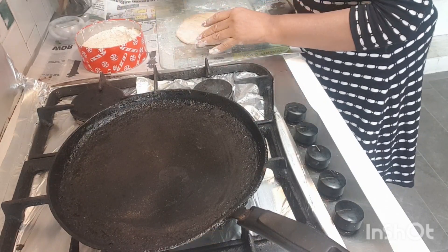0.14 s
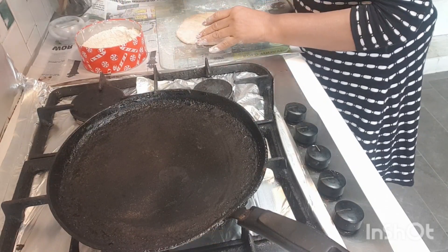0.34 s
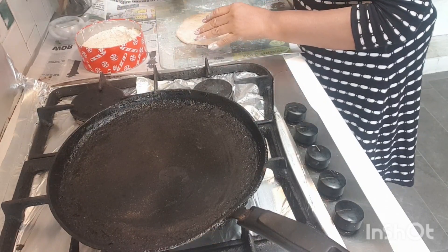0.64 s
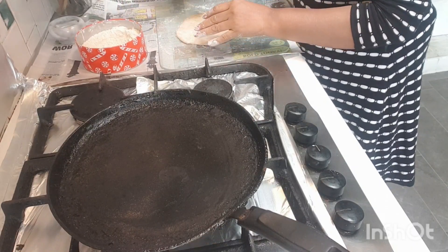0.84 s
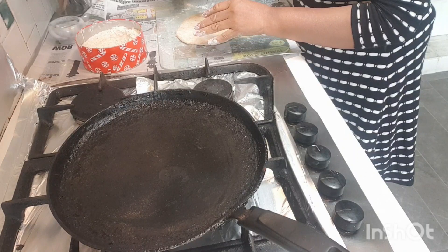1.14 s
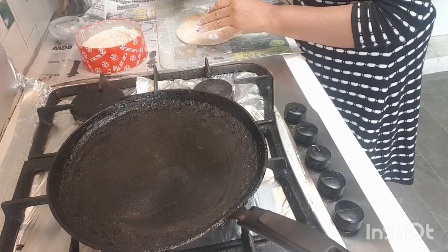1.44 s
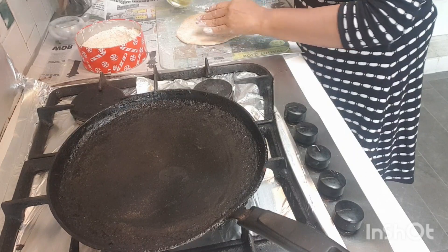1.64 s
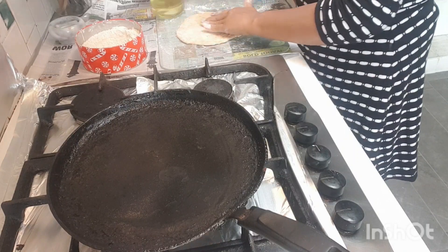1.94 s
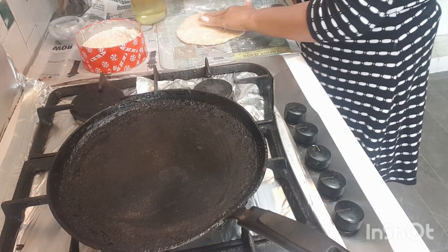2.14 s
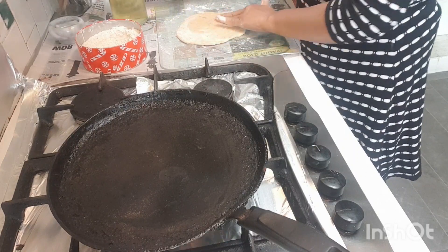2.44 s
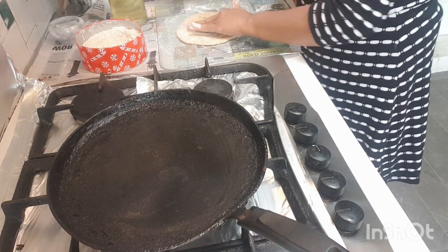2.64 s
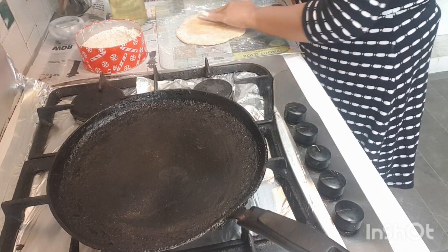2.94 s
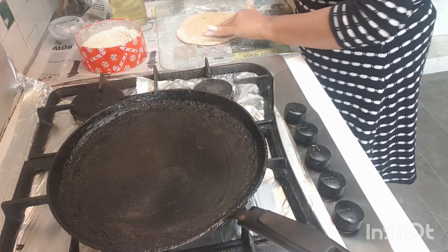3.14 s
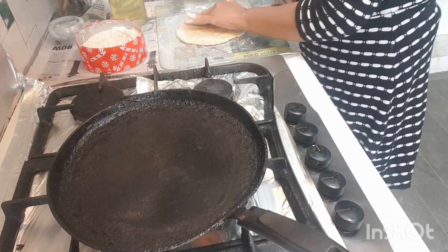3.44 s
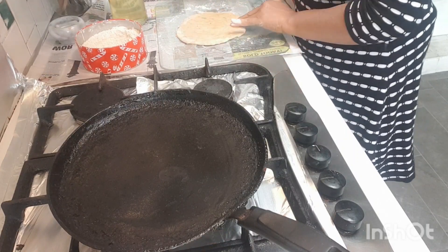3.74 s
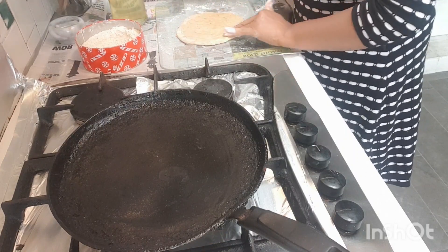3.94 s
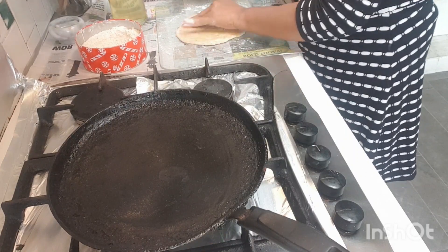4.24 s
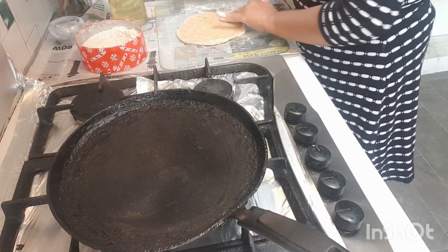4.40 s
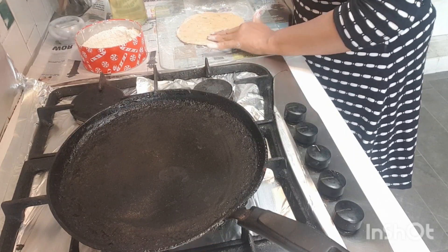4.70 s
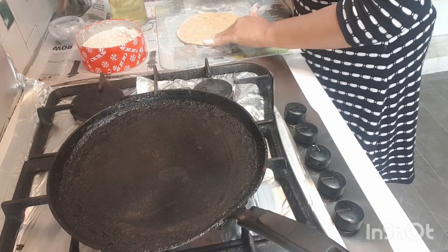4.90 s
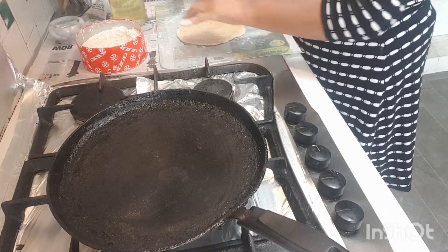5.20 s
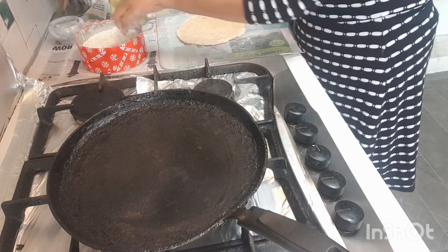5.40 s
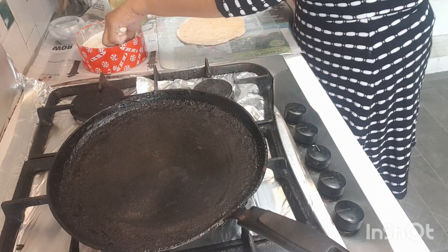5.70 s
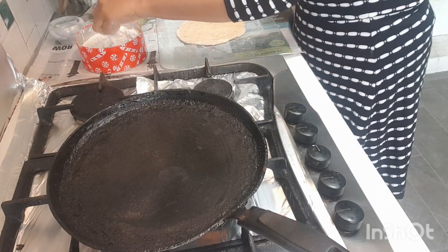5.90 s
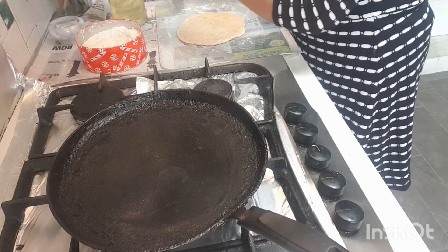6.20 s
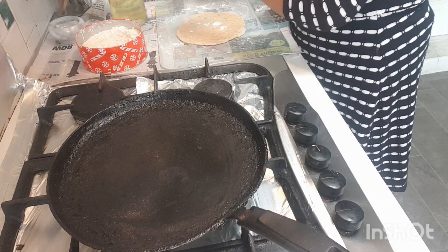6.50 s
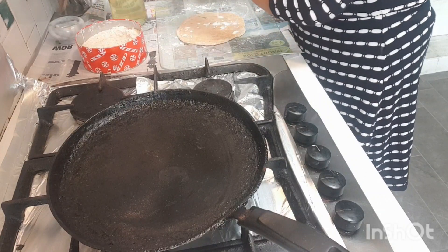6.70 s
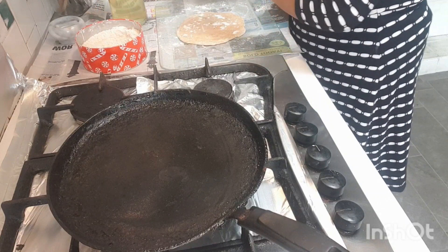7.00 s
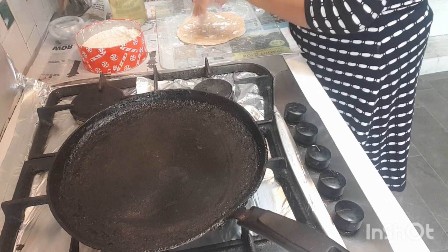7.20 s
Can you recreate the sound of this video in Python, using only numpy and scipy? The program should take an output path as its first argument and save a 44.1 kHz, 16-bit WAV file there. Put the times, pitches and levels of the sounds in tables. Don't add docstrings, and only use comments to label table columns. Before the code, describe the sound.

In a hard-walled kitchen, close to a stereo microphone, hands pat dough on paper, making sharp irregular snaps and small crinkles. About two seconds in, a heavy bottle lands with a loud, deep thump, bounces and scrapes in a stuttering glassy drag. The crackling continues to the end over a steady fan, mains hum and muffled street engines, one revving and rising in pitch.

```python
import sys
import numpy as np
from scipy import signal
from scipy.fft import rfft, irfft, next_fast_len
from scipy.io import wavfile
from scipy.ndimage import uniform_filter1d, map_coordinates

SR = 44100
rng = np.random.default_rng(int(sys.argv[2]) if len(sys.argv) > 2 else 0)


def unload_wav(signal):
    wavfile.write(
        sys.argv[1],
        SR,
        np.round(np.clip(np.atleast_2d(signal).T, -1, 1) * 32767).astype(np.int16),
    )


def volts_from_decibels(level):
    exponent = np.asarray(level, float) / 20
    return 10 ** exponent


N = 324135
T = np.arange(N) / SR


def in_time(rows):
    s, *columns = np.transpose(rows)
    return [np.interp(T, s, column) for column in columns]


def sounding(rows, fade_s=0.11):
    opening = T - rows[0][0] + fade_s
    closing = rows[-1][0] + fade_s - T
    return np.clip(np.minimum(opening, closing) / fade_s, 0, 1)


def at_hz(points, hz):
    table_hz, value = np.array(points).T
    return np.interp(np.log(hz), np.log(table_hz), value)


def rms_one(x):
    return x / np.sqrt(np.mean(x ** 2) + 1e-20)


def band(x, low_hz, high_hz):
    edges = [low_hz, min(high_hz, .45 * SR)]
    return signal.sosfilt(signal.butter(2, edges, "band", fs=SR, output="sos"), x + 1e-18)


def drift(rate_hz):
    knots = rng.standard_normal(600)
    coarse = T[::16]
    return np.interp(T, coarse, map_coordinates(knots, [coarse * min(rate_hz, 70)], order=3))


def resonate(x, hz, width_hz):
    r = np.exp(-np.pi * width_hz / SR)
    zeros = np.array([1, 0, -1]) * (1 - r * r) / 2
    return signal.lfilter(zeros, [1, -2 * r * np.cos(2 * np.pi * hz / SR), r * r], x + 1e-18)


def wander(x, hz, width_hz):
    turn = np.exp(2j * np.pi * np.cumsum(hz) / SR)
    r = np.exp(-np.pi * width_hz / SR)
    return np.real(turn * signal.lfilter([1 - r], [1, -r], x / turn + 1e-18))


def ring(clicks, modes, damping=1):
    out = 0
    for hz, level_db, t60_s in modes:
        r = volts_from_decibels(-60 / (np.clip(t60_s * damping, .005, .4) * SR))
        w = 2 * np.pi * hz / SR
        out += volts_from_decibels(level_db) * signal.lfilter([0, np.sin(w)], [1, -2 * r * np.cos(w), r * r], clicks + 1e-18)
    return out


def grains(per_s, spread_db):
    sizes = volts_from_decibels(spread_db * np.minimum(rng.exponential(1, (2, N)), 4))
    signs = rng.choice([-1, 1], (2, N))
    return sizes * signs * (rng.random((2, N)) < per_s / SR)


def dying(events, over_db, t60_s):
    lifts = np.zeros(N)
    for s, level_db in events:
        lifts[round(s * SR)] = volts_from_decibels(level_db + over_db)
    lifts = np.convolve(lifts, np.ones(40) / 40)[:N]
    return 1 + signal.lfilter([1], [1, -volts_from_decibels(-60 / (t60_s * SR))], lifts + 1e-18)


# (frequency [Hz], correlation [-1 to 1])
PORT_LIKENESS = [(60, 0.99), (130, 0.92), (290, 0.76), (640, 0.95), (1410, -0.19), (3100, -0.29),
                 (6820, -0.32), (15000, 0.34)]


def two_ports(mid, side, hz):
    alike = np.clip(at_hz(PORT_LIKENESS, hz), -1, 1)
    return np.sqrt(1 + alike) * mid + np.sqrt(1 - alike) * side * [[1], [-1]]


# (frequency [Hz], level difference [dB])
PORT_LEAN = [(60, 5), (300, 4), (600, 18), (1300, 4), (2400, 6.5), (4400, -5.5), (7000, 5), (15000, 19.5)]


def coloured(pair, spectrum):
    size = next_fast_len(N + 4096)
    hz = np.clip(np.arange(size // 2 + 1) * SR / size, 1, spectrum[-2][0])
    mid, side = rfft(pair, size) * volts_from_decibels(at_hz(spectrum, hz))
    lean = volts_from_decibels(at_hz(PORT_LEAN, hz) / 2 * [[1], [-1]])
    return rms_one(irfft(two_ports(mid, side, hz) * lean, size)[:, :N])


def kitchen(x):
    t60_s, level_db = 0.38, -6
    t = np.arange(SR // 2) / SR
    tail = rng.standard_normal((2, len(t))) * volts_from_decibels(-60 * t / t60_s) * (t > .003)
    tail = band(tail, 180, 4700) + 1.28 * tail
    tail /= np.sqrt(np.sum(tail ** 2, axis=1, keepdims=True))
    return x + volts_from_decibels(level_db) * signal.fftconvolve(x, tail, axes=1)[:, :N]


def low_tone(hz, gain):
    phase = 2 * np.pi * np.cumsum(hz) / SR + .2 * drift(8)
    tone = np.sin(phase) + volts_from_decibels(-32) * np.sin(3 * phase) + volts_from_decibels(-30) * np.sin(2 * phase)
    return np.sqrt(2) * gain * tone


# (time [s], pitch [Hz], level [dB])
MAINS_HUM = [(0.0, 49.1, -64), (2.35, 49.1, -54.5), (4.9, 48.7, -60.5), (5.8, 49.04, -53),
             (7.35, 50.3, -55)]


def mains():
    hz, level_db = in_time(MAINS_HUM)
    return low_tone(hz, volts_from_decibels(level_db))


# (time [s], firing tone [Hz], level [dB])
FAR_ENGINES = [
    [(.2, 108.5, -55.5), (.5, 111.7, -43.5), (.7, 119.1, -49.5)],
    [(.95, 120.4, -52.5), (1.85, 120.6, -52)],
    [(0, 53, -49), (.45, 56.6, -53)],
    [(.8, 57, -50), (1.85, 59.3, -53)],
    [(3.3, 110.7, -54.5), (4.5, 122.5, -58.5)],
    [(4.85, 66.6, -56), (5.8, 82, -60.5)],
    [(6.05, 85.8, -53), (6.22, 86.3, -49.5)],
    [(6.4, 73.2, -53.5), (6.6, 71.8, -49)],
    [(7.2, 82.7, -54), (7.35, 93.6, -42.5)],
    [(6.5, 101.3, -60), (6.6, 102.3, -49.5)],
    [(6.9, 101.4, -57), (7.0, 108.3, -56)],
]


def far_engines():
    out = np.zeros(N)
    for rows in FAR_ENGINES:
        hz, level_db = in_time(rows)
        out += low_tone(hz, volts_from_decibels(level_db) * sounding(rows, fade_s=.16))
    return out


# (time
# [s], pitch [Hz], level [dB])
ENGINE_WHINES = [
    [(0, 108, -60), (.2, 108, -76)],
    [(2.35, 122, -67), (2.75, 135, -60), (3.05, 123, -63)],
    [(4.1, 240, -71), (4.5, 260, -71.5)],
    [(5.4, 246, -69), (6.3, 264, -73)],
    [(5.8, 82, -60), (6.05, 86, -56)],
]


def whines():
    out = np.zeros(N)
    for rows in ENGINE_WHINES:
        hz, level_db = in_time(rows)
        gain = volts_from_decibels(level_db + 1.4 * drift(9)) * sounding(rows, fade_s=.16)
        out += np.sqrt(2) * gain * np.sin(2 * np.pi * np.cumsum(hz) / SR)
    return out


# (time [s], firing tone [Hz], level [dB])
LORRY_REVS = [
    (2.2, 61.27, -36.5),
    (2.75, 67.44, -33.5),
    (3.1, 61.1, -35.5),
    (3.25, 66.74, -34),
    (3.75, 82.4, -46),
    (4.23, 91.54, -38),
    (4.68, 104.8, -40.5),
    (5.3, 118.2, -45),
    (5.9, 130, -79),
]
# (pitch [Hz], width [Hz], depth [dB])
WALL_DIPS = [(60.16, 6.8, -10), (75.1, 3.1, -20), (82, 2.1, -7), (92.5, 4.4, -17.5), (98.8, 6, -11.5),
             (110.8, 4.8, -10), (116.15, 3.1, -18)]


def lorry():
    hz, level_db = in_time(LORRY_REVS)
    dips_db = sum(db * np.exp(-(2 * (hz - dead_hz) / width_hz) ** 2) for dead_hz, width_hz, db in WALL_DIPS)
    return low_tone(hz, volts_from_decibels(level_db) * sounding(LORRY_REVS) * volts_from_decibels(dips_db))


# (frequency [Hz], density [dB per Hz])
FAN_AIR = [(15, -54), (32, -7), (60, 4.5), (99, 1), (340, -18.5), (537, -19.5), (826, -21), (945, -84),
           (1140, -32.5), (2060, -34), (2850, -31.5), (3090, -74), (7300, -27), (13200, -39), (15500, -45)]
# (frequency [Hz], width [Hz], level [dB])
FAN_HOUSING = [(205.5, 17, -86), (292.4, 35, -73), (100.7, 19, -59.5), (434, 5.2, -75), (629, 84, -65.5),
               (743, 20, -69), (814.7, 66.5, -65.5), (2445, 120, -77.5), (2817, 140, -78)]


def fan():
    flutter = volts_from_decibels(.7 * drift(6))
    air = volts_from_decibels(-53) * flutter * coloured(rng.standard_normal((2, N)), FAN_AIR)
    for hz, width_hz, level_db in FAN_HOUSING:
        mid, side = resonate(resonate(rng.standard_normal((2, N)), hz, width_hz), hz, width_hz)
        air += volts_from_decibels(level_db + 3.5 * drift(4.2)) * rms_one(two_ports(mid, side, hz))
    return air


# (time [s], pitch [Hz], width [Hz], level [dB], t60 [s])
NUDGES = [
    (2.559, 4940, 70, -49, .2),
    (2.555, 2270, 40, -58, .45),
    (1.046, 1640, 170, -67, .22),
    (1.045, 2350, 300, -69, .22),
    (1.044, 1250, 400, -64, .05),
    (6.756, 1270, 110, -69, .3),
    (3.478, 3550, 350, -62, .06),
    (3.61, 1200, 150, -74, .1),
]


def clinks():
    out = np.zeros((2, N))
    length = SR // 4
    for s, hz, width_hz, level_db, t60_s in NUDGES:
        at = round(s * SR)
        fading = volts_from_decibels(level_db - 60 * T[:length] / t60_s)
        rub = rng.standard_normal(length) + .5 * rng.standard_normal((2, length))
        out[:, at:at + length] += fading * rms_one(resonate(resonate(rub, hz, width_hz), hz, width_hz))
    return out


# (time [s], peak [dB], knock against peak [dB], direction [1 down, -1 springing back])
COUNTER_BLOWS = [
    (1.955, -8.5, -19.5, 1),
    (1.9735, -47, -10, 1),
    (2.0082, -22, -28, 1),
    (2.031, -26, -19, 1),
    (2.093, -20.5, -15, 1),
    (2.2535, -19.5, -25, -1),
    (2.2905, -17.5, -28, -1),
    (2.337, -20, -27.5, -1),
    (2.384, -28, -22, -1),
    (4.6908, -24, -48, 1),
]
# (frequency [Hz], level [dB], t60 [s])
SLAB_MODES = [(108.5, 5.5, 0.31), (130, -2, 0.067), (157.2, 5, 0.11), (175, -26.5, 0.027),
              (206, -17.5, 0.087), (289.6, -16, 0.27), (435, -6, 0.019)]


def slab(push):
    contact_s, give_s, give_share = 0.0035, 0.0023, 0.25
    blows = np.zeros(N)
    for s, peak_db, _, way in COUNTER_BLOWS:
        blows[round(s * SR)] = np.sign(way) * volts_from_decibels(peak_db - 15)
        blows[round((s - give_s) * SR)] = -give_share * np.sign(way) * volts_from_decibels(peak_db - 7)
    contact = np.hanning(round(contact_s * SR))
    blows = np.convolve(blows, contact / contact.sum())[:N]
    return band(band(ring(blows + push, SLAB_MODES), 73, 590), 33, 1000)


# (frequency [Hz], level [dB], t60 [s])
BASE_MODES = [(421, -1, 0.17), (641, -24, 0.1), (737, -20, 0.3), (824, -26, 0.6), (920, -17, 0.46),
              (1020, -20, 0.1), (1220, -40, 0.3), (1370, -13.5, 0.34), (1630, -19, 0.28)]


def bottle_knocks():
    knock = np.zeros(N)
    for s, peak_db, hard_db, _ in COUNTER_BLOWS:
        knock[round(s * SR)] = volts_from_decibels(peak_db + hard_db + 5.5)
    solid = SR // 450
    t = np.arange(SR // 4) / SR
    rattle = rng.standard_normal(len(t)) * volts_from_decibels(-2.5 - 60 * t / 0.37)
    rattle[solid] += volts_from_decibels(27.5)
    knocks = signal.fftconvolve(knock, rattle)[:N]
    base = volts_from_decibels(-8.5) * ring(np.roll(knock, solid), BASE_MODES, damping=0.68)
    hard = band(band(band(knocks, 300, 1150), 250, 1250) + base, 200, 1700)
    ping = resonate(resonate(knocks, 2870, 350), 2870, 350)
    return hard + volts_from_decibels(-11) * ping + volts_from_decibels(-28) * band(knocks, 1700, 3400)


# (time [s], scrape [dB], weight on the base [dB])
DRAG_COURSE = [
    (2.025, -46.5, 0),
    (2.085, -60.5, 27),
    (2.096, -37, 16),
    (2.12, -33.5, 10),
    (2.126, -30, 1.5),
    (2.245, -29.5, 9.5),
    (2.28, -35.5, 9),
    (2.4, -52.5, 8),
    (2.6, -58, 8),
]
# (frequency [Hz], density [dB per Hz])
SCRAPE_GRIT = [(180, -44), (300, 6.5), (599, 2), (660, -7), (775, -4.5), (840, 1.5), (1620, -7.5),
               (3040, -1.5), (5880, -1.5), (8600, -1.5), (15000, -11), (16000, -30)]
# (frequency [Hz], width [Hz], level [dB])
BOTTLE_MODES = [(407, 31, -1), (753, 31, 12.5), (970, 60, 8), (1590, 9.1, 13), (1777, 20, 11),
                (4120, 110, 12), (4700, 25, 1), (5900, 220, 2)]
# (time [s], level [dB])
BASE_JERKS = [(2.0945, -28), (2.101, -21), (2.1225, -23.5), (2.126, -28), (2.130, -23.5), (2.1445, -29),
              (2.1475, -29), (2.153, -21), (2.158, -28), (2.164, -23), (2.175, -31), (2.1788, -26),
              (2.1845, -29), (2.196, -38), (2.2012, -24), (2.207, -29), (2.2125, -24), (2.2262, -33),
              (2.231, -29), (2.236, -24), (2.249, -32), (2.252, -38), (2.258, -40), (2.2643, -33)]
# (time [s], level [dB])
BASE_CATCHES = [(2.0882, -25.5), (2.0947, -28), (2.1001, -43), (2.1137, -29), (2.1278, -28), (2.1406, -41),
                (2.1455, -28), (2.1515, -38), (2.1571, -22), (2.1625, -27), (2.1684, -36), (2.177, -24),
                (2.1839, -21.5), (2.1954, -29), (2.2006, -17.5), (2.2113, -28), (2.2217, -32.6),
                (2.2301, -23), (2.2382, -28.5), (2.2431, -40), (2.25, -32), (2.2651, -40), (2.2776, -35)]
# (time [s], pitch [Hz])
TILTING_NOTE = [(2.09, 3000), (2.102, 3100), (2.128, 3170), (2.155, 3320), (2.185, 3030), (2.2, 3100),
                (2.226, 2930), (2.25, 3100), (2.3, 3320)]


def drag():
    scrape_db, weight_db = in_time(DRAG_COURSE)
    steady = grains(per_s=8000, spread_db=2.2) * volts_from_decibels(.4 * drift(70))
    hiss_slips = steady * dying(BASE_JERKS, over_db=24, t60_s=.07)
    jerk_slips = steady * dying(BASE_JERKS, over_db=30, t60_s=.033)
    catch_slips = steady * dying(BASE_CATCHES, over_db=40, t60_s=.022)

    def through_bottle(slips, low_hz, high_hz):
        rings = sum(volts_from_decibels(level_db) * rms_one(resonate(slips, hz, width_hz))
                    for hz, width_hz, level_db in BOTTLE_MODES if low_hz < hz < high_hz)
        return rms_one(band(coloured(slips, SCRAPE_GRIT) + volts_from_decibels(-11.5) * rms_one(rings), low_hz, high_hz))

    hiss = through_bottle(hiss_slips, 6500, 17000)
    upper = through_bottle(jerk_slips, 1300, 6500)
    lower = through_bottle(catch_slips, 300, 1500)
    glass = wander(jerk_slips, in_time(TILTING_NOTE)[0], width_hz=430)
    upper = upper + volts_from_decibels(-12) * hiss + volts_from_decibels(-0.5) * rms_one(glass)
    lower = .3 * lower.sum(axis=0) + .6 * lower
    gate = sounding(DRAG_COURSE, fade_s=0.007)
    push = np.tanh(rms_one(catch_slips[0])) * volts_from_decibels(scrape_db + weight_db - 37) * gate
    return gate * volts_from_decibels(scrape_db - 7.5) * (upper - volts_from_decibels(weight_db - 12.5) * lower), push


# (time [s], level [dB])
RUSTLE_LEVEL = [(0.0, -64.5), (0.29, -69.5), (0.78, -74), (0.94, -71), (2.05, -69), (2.31, -53.5),
                (2.41, -54.5), (2.58, -69.5), (3.83, -66), (4.13, -66), (4.89, -69.5), (5.34, -70),
                (5.85, -74.5), (6.08, -73.5), (6.2, -64), (6.34, -70), (7.35, -70.5)]
# (frequency [Hz], density [dB per Hz])
PAPER_COLOUR = [(590, -38), (1000, -1.5), (1600, -7), (1790, -12), (2840, 9), (3080, -2.5), (5720, 6),
                (8740, -2.5), (11000, -1), (15500, -7)]


def paper_rustle():
    rustle = coloured(grains(per_s=1200, spread_db=2.0), PAPER_COLOUR)
    return rustle * volts_from_decibels(in_time(RUSTLE_LEVEL)[0] + 9) * volts_from_decibels(3 * drift(45))


# (time [s], peak [dB], brightness [dB], crinkle after it [dB], deep body [dB])
PAPER_SNAPS = [(0.0545, -40, -8, -6, -15), (0.0682, -35, -8, -6, -28), (0.0833, -64, -2, -6, -10),
               (0.1099, -34, -2, -7.5, -19), (0.161, -46.5, 6, -5.5, -5), (0.1779, -45, -5, -13, -3),
               (0.2504, -36, 0, -9, -9), (0.2664, -36.5, -2, -7, -16), (0.3081, -33, -1, -10.5, -18),
               (0.3465, -37.5, 3, -12.5, -17), (0.396, -41.5, 8, -14, -20), (0.439, -52.5, 1, 0.5, -9),
               (0.4993, -50.5, 0, -2.5, -19), (0.566, -51, 9, 0, -5.5), (0.592, -43, 13, -17.5, 10),
               (0.607, -61, -1, -10, -8), (0.6954, -53.5, 16.5, -9, 5), (0.8068, -47.5, -3, -10, -24),
               (0.954, -42, -17, -8.5, -28), (1.066, -45, -21, -1.5, -9), (1.1602, -51, -2, -3.5, -16),
               (1.255, -54, 5, -4, -19), (1.272, -48, 7, -10, -20), (1.284, -37, -11, -7, -19),
               (1.3127, -38, 0, -4.5, -18), (1.3841, -31.5, 1.5, -9, -22), (1.5548, -54, 3, -6, -21),
               (1.651, -57, 9, -7, -8), (1.665, -49, -1, -10, 2.5), (1.701, -49, -8, -3, -5),
               (1.7087, -52, -9, -3, -4), (1.731, -45.5, -5, -1, -11), (1.762, -37, -4.5, -6, -29),
               (1.7803, -41, -14, -3, -27), (2.0024, -41.5, -4, -6, -5), (2.0247, -53, -3, -9, -9),
               (2.0318, -48, 6, -3, -15), (2.0692, -36, 0.5, -4, -5), (2.4314, -50, -2, -8, -15),
               (2.46, -51, 8, -1, -16), (2.4728, -34, 11, -22, -3), (2.4778, -21.5, -12.5, -2.5, -11),
               (2.5586, -44.5, -19, 4.5, -9), (2.725, -38.5, -29, -1, -20), (2.817, -47, 5, -2.5, -1),
               (2.8616, -48, 3, -3, -17), (2.9144, -35.5, -4, -9, 0.5), (2.974, -43.5, -22, -0.5, -5.5),
               (3.215, -57, -3, 3, -3.5), (3.323, -57, -18, -5, 6), (3.453, -43, -18, -2.5, -31),
               (3.481, -50, -14, -7, -4), (3.508, -55, -19, -9, -20), (3.5228, -39.5, -5, -2.5, -20),
               (3.634, -54, -5, -3, -12), (3.659, -47.5, -26, -0.5, -12), (3.7002, -46.5, -22, 2, -17),
               (3.7655, -49, -20, -3, -10), (3.8286, -57, -5, -8, 0), (3.85, -41.5, 7, -7, -3),
               (3.8788, -48, 9, -6, -22.5), (3.9, -50, 5, -2, -6), (3.9402, -33, -6, -5, -6.5),
               (4.0682, -41, 7, -8.5, -14), (4.0919, -28, -3.5, -13.5, -7), (4.2423, -42.5, -8, -6, -21),
               (4.3113, -24, -4.5, -3, -20), (4.4464, -30.5, -7, -6.5, -21), (4.4577, -38.5, 6, -10, -5.5),
               (4.5128, -31.5, -16, -3, -17), (4.6105, -60.5, 8, 2, -16), (4.6343, -49, -20, -1, -21),
               (4.6665, -47, -18, -2, -20), (4.6907, -42, -5, -5.5, -10), (4.819, -42, -4, -4, -16),
               (4.824, -41.5, 2.5, -2.5, -29), (4.8542, -44, 4, -4.5, -20), (4.8875, -45, 1, -12, -21),
               (4.9302, -51.5, -6, -1.5, -24),
               (5.0441, -35.5, -10, -2.5, -31), (5.138, -54, -15, -1, -10), (5.167, -38.5, -5, -6, -16),
               (5.2686, -37.5, -6, -1.5, -37), (5.37, -49.5, 2, -3, -18), (5.424, -40, 5, -16, -20),
               (5.4779, -46, 0, -8, -33), (5.523, -51, -1, -5, -29), (5.5636, -58, 6, -7, -21),
               (5.5836, -50, 4, -8, -20), (5.638, -42.5, -1, -8, -25), (5.6871, -53, -4, -3, -16),
               (5.761, -51, 0, -3, -26), (5.8234, -38.5, -3, -2.5, -18), (5.9496, -64, 16, -10, -11),
               (6.0287, -49.5, -9, -1, -17), (6.069, -53, -5, -5, -13), (6.0911, -50, -8, -3, -17),
               (6.1337, -50, -12, -12, -5), (6.1571, -32.5, -8, -6, -8.5), (6.1773, -37.5, -9, -9, -15),
               (6.196, -37, -17, -3, -12), (6.2083, -33.5, 1, -10, -20), (6.228, -44, 10, -7, -19),
               (6.278, -36, -7, -4, -11), (6.291, -46.5, -2, 8, -11), (6.3064, -50, -6, -9, -11),
               (6.3286, -34, -10, -1.5, -18), (6.3776, -48.5, -5, -1.5, -11.5), (6.4762, -62, -3, -8, -19),
               (6.4882, -35, -9, -2, -15.5), (6.6045, -42.5, -11, -5, -26), (6.6404, -46, 0, -6, -20),
               (6.658, -47, 5, -5, -14), (6.7286, -36, -0.5, -8, -18), (6.8618, -37.5, -17, -4, -12.5),
               (6.991, -48, -19, -2, -32), (7.0675, -42.5, -35, -0.5, -7.5), (7.1768, -35, -31, -10, -26),
               (7.2356, -31, -13, -9.5, -13.5)]


def paper_snaps():
    crack_t60_s, crinkle_t60_s = .004, .056
    far_lag, far_db = 8, -3
    t = np.arange(SR // 8) / SR
    low, body, top, breaks = np.zeros((4, 2, N + 2 * len(t)))
    blunt, keen = np.hanning(7) / 2, np.eye(7)[3]
    for s, peak_db, bright_db, crinkle_db, low_db in PAPER_SNAPS:
        noise = np.tanh(2 * rng.standard_normal((2, len(t))))
        uneven = volts_from_decibels(3.5 * rng.standard_normal(len(t) // 64 + 1)).repeat(64)[:len(t)]
        crack = noise * volts_from_decibels(-5 - 60 * t / crack_t60_s)
        crack[:, 0] = volts_from_decibels(-10) * np.array([1, -1])
        crinkle = noise * volts_from_decibels(crinkle_db - 3.5 - 60 * t / crinkle_t60_s) * uneven
        start = round(s * SR) + 52
        at = slice(start, start + len(t))
        gain = volts_from_decibels(peak_db + 8.5)
        bright = volts_from_decibels(bright_db + 6)
        dip = gain * volts_from_decibels(6) * (blunt + np.clip(bright, .45, 1.5) * (keen - blunt / 0.98))
        breaks[0, start:start + 7] -= dip
        breaks[1, start + far_lag:start + far_lag + 7] -= volts_from_decibels(far_db) * dip
        low[:, at] += gain * volts_from_decibels(low_db + 3.5) * (crack + volts_from_decibels(3) * crinkle)
        body[:, at] += gain * (crack + crinkle)
        top[:, at] += gain * bright * (crack + volts_from_decibels(-4.5) * crinkle)
    snaps = band(low, 1500, 4400) - band(body, 4400, 8500) + band(top, 9000, 15500)
    snaps += band(breaks, 2300, 17000)
    snaps[1] *= volts_from_decibels(-5)
    return snaps[:, :N]


def scene():
    scrape, push = drag()
    lows = mains() + far_engines() + whines() + lorry() + slab(push) + bottle_knocks()
    lows = lows * volts_from_decibels(np.array([[1.9], [-2.2]]))
    lows[1] = np.roll(lows[1], 6)
    near = kitchen(paper_rustle() + paper_snaps()) + scrape
    fade_out = np.clip((T[-1] - T) / .006, 0, 1)
    return (fan() + clinks() + near + lows) * fade_out


def band_limit(x):
    return signal.sosfilt(signal.butter(12, 16760, fs=SR, output="sos"), x)


def record(dry):
    shaded = dry - resonate(dry, 8800, 3500) * [[.4], [.88]]
    shaded -= 1.7 * resonate(shaded, 14500, 3600)
    shaded = signal.sosfilt(signal.butter(2, 33, "high", fs=SR, output="sos"), shaded)
    cut = signal.sosfiltfilt(signal.ellip(6, .3, 35, 15620, fs=SR, output="sos"), shaded)
    edge = shaded - cut
    power = np.sum(edge ** 2, axis=0)
    sudden = uniform_filter1d(power, size=128) > 3.8 * uniform_filter1d(power, size=2048)
    kept = .5 * uniform_filter1d(1. * sudden, size=128)
    return band_limit(cut + kept * edge)


dry = scene()
out = record(dry)
unload_wav(out)
```